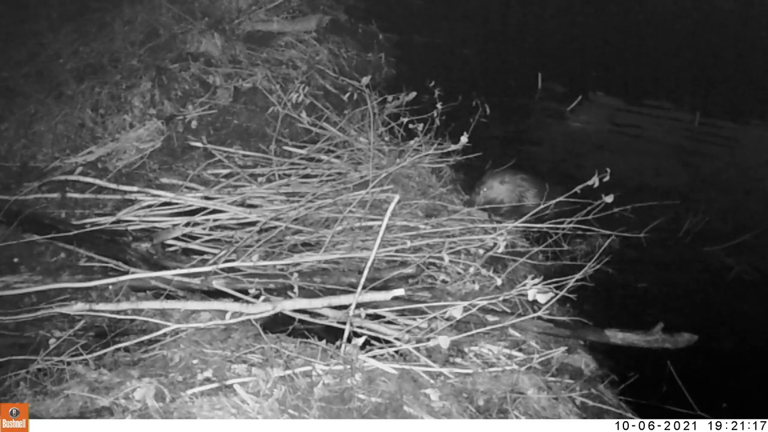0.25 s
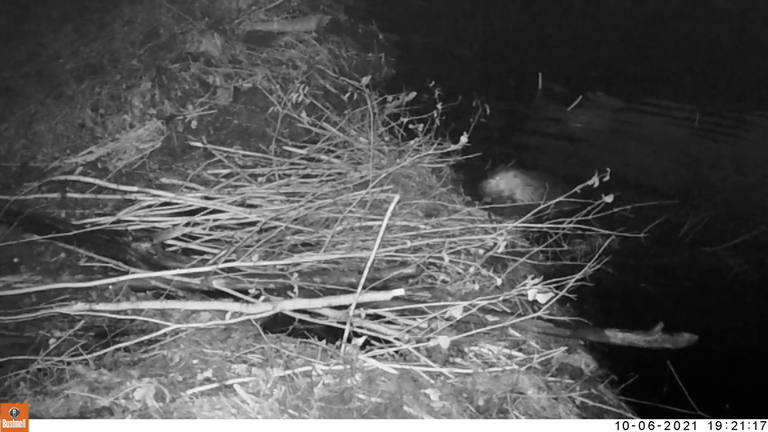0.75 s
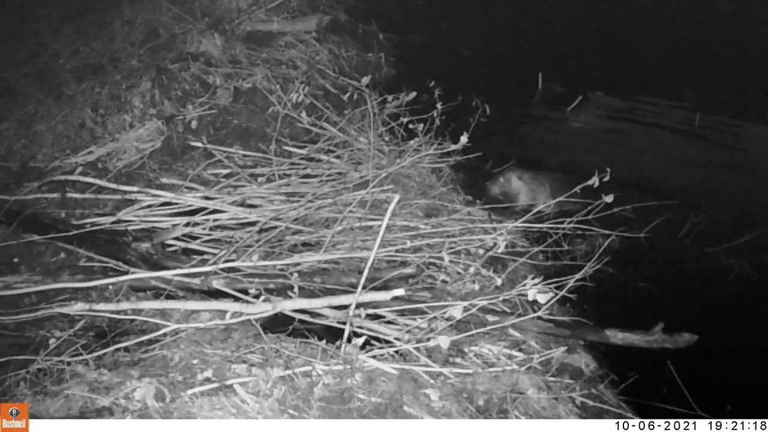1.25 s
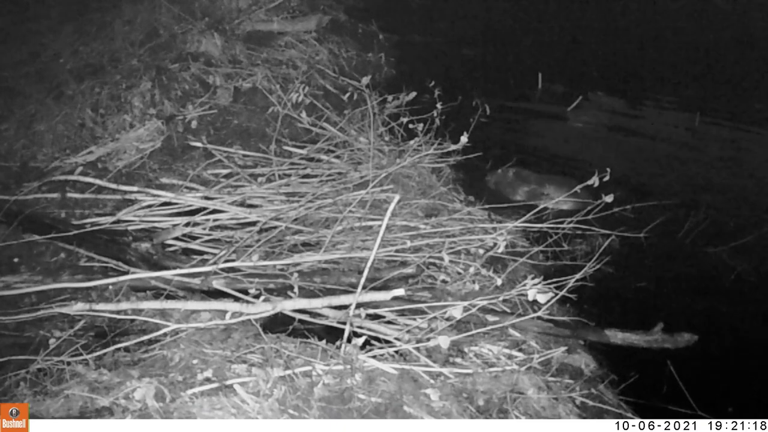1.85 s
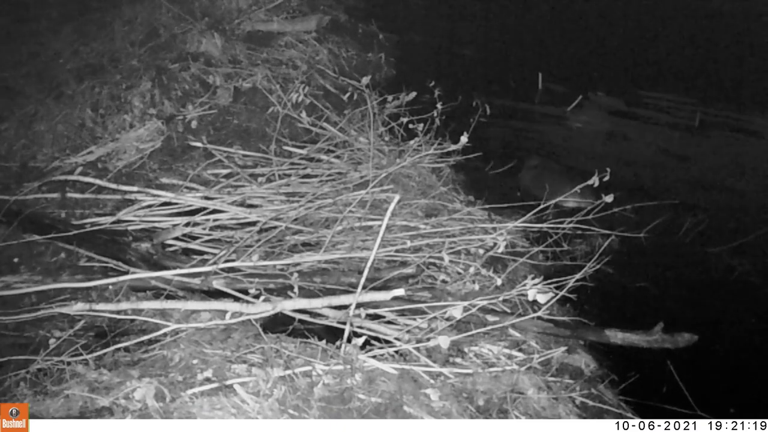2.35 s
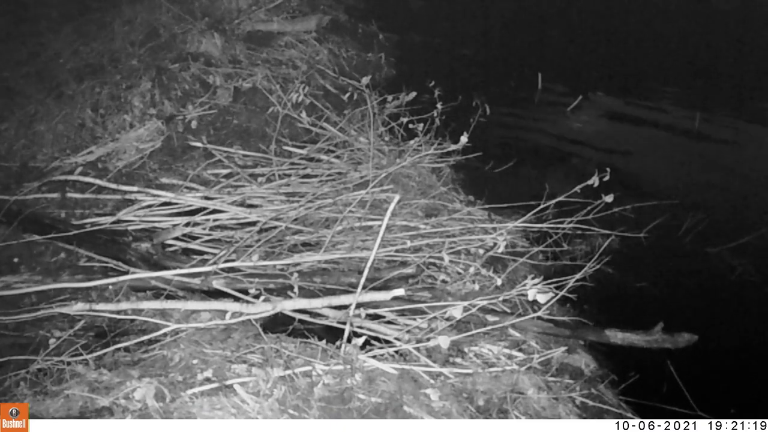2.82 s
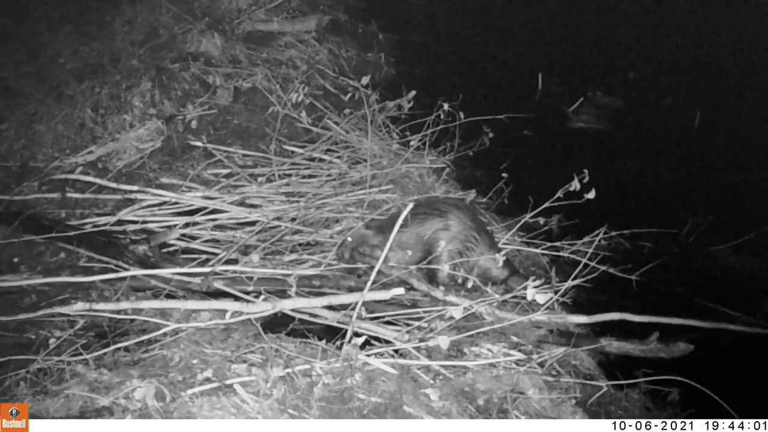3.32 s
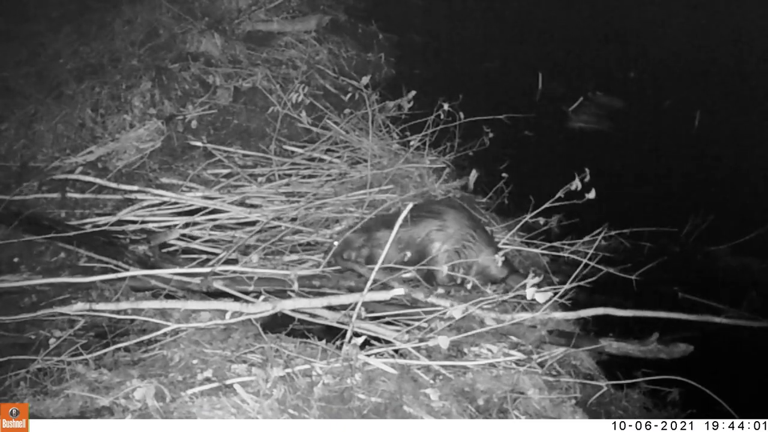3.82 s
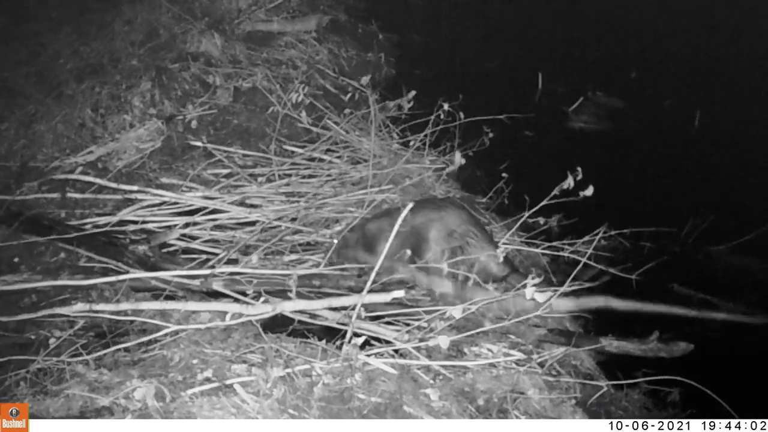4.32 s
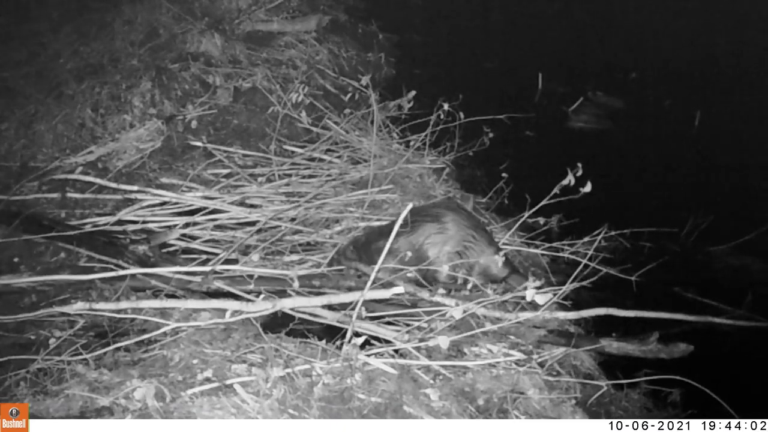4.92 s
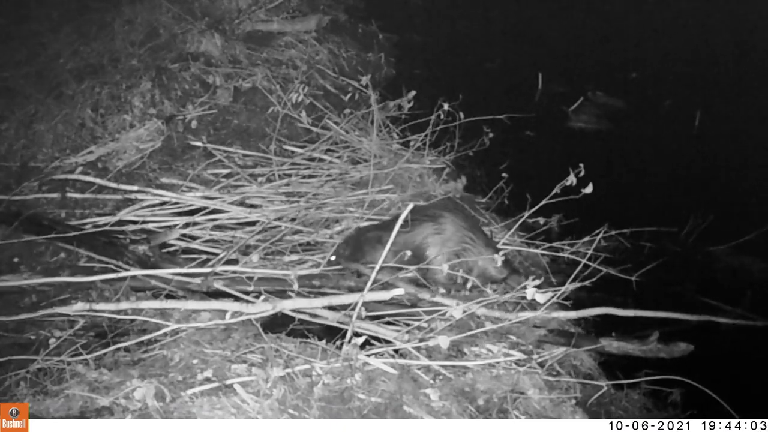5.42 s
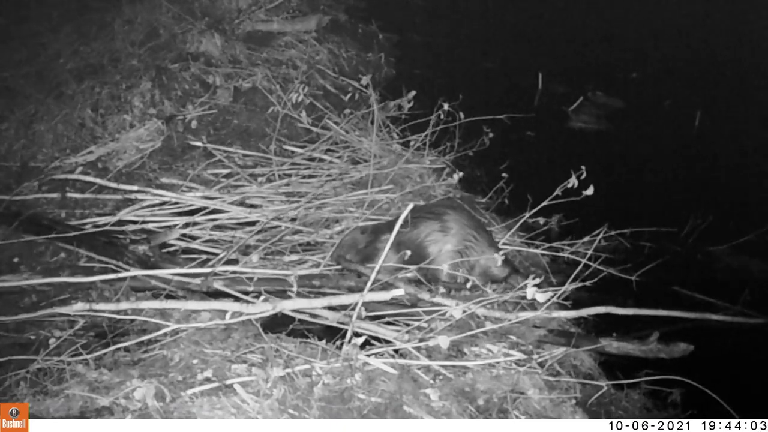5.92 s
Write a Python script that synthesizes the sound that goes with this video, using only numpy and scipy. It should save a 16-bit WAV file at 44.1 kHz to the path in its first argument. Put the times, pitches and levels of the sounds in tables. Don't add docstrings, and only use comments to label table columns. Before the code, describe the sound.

Water rushes low and steady at a stick dam while crickets trill shrilly nearby and droplets tick; sound nearly vanishes briefly past halfway, then twigs snap.

```python
import sys
import numpy as np
from scipy import signal
from scipy.fft import rfft, irfft
from scipy.io import wavfile
from scipy.ndimage import uniform_filter1d

SR = 44100
rng = np.random.default_rng(int(sys.argv[2]) if len(sys.argv) > 2 else 0)


def gain_from_decibels(decibels):
    exponent = np.asarray(decibels, float) / 20
    return 10 ** exponent


def pcm_store(signal):
    levels = np.round(np.clip(np.atleast_2d(signal), -1, 1) * 32767)
    wavfile.write(sys.argv[1], SR, levels.astype(np.int16).T)


N = 272087


def add(out, at_s, sound):
    i = int(at_s * SR)
    out[i:i + len(sound)] += sound[:max(N - i, 0)]


def walk(rate_hz):
    hold = int(SR / rate_hz)
    steps = np.repeat(rng.standard_normal(N // hold + 1), hold)
    return 1.52 * uniform_filter1d(uniform_filter1d(steps, hold), hold)[:N]


def band(x, lo_hz, hi_hz):
    return signal.sosfilt(signal.butter(2, [lo_hz, min(hi_hz, .45 * SR)], "band", fs=SR, output="sos"), x)


# pitch in Hz, level of the noise there in dB per Hz.
RUSH_COLOUR = [(8, 3), (30, 1), (70, -3.5), (160, -12), (440, -22.5), (1300, -34), (3200, -39.5),
               (5000, -41), (6300, -44.5), (7500, -44.5), (9500, -45.5), (14000, -47)]
# time in seconds, flow in dB.
RUSH_FLOW = [
    (0, 0.5),
    (1.6, 0.03),
    (3.3, -0.3),
    (3.9, 0.44),
    (4.9, 0.1),
    (6.17, 0.4),
]


def rush():
    hz = np.fft.rfftfreq(N, 1 / SR) + 1
    points, dbs = np.transpose(RUSH_COLOUR)
    colour = rfft(rng.standard_normal(N)) * gain_from_decibels(np.interp(np.log(hz), np.log(points), dbs))
    out, swell = 0, walk(2.966)
    for centre in np.arange(2, 15, .5):
        share = np.clip(1 - 2 * abs(np.log2(hz) - centre), 0, 1)
        flicker = walk(9.0)
        out = out + irfft(colour * share, N) * gain_from_decibels(.4 * swell + .5 * flicker)
    s, flow_db = np.transpose(RUSH_FLOW)
    return out / np.std(out) * gain_from_decibels(-34.0 + np.interp(np.arange(N) / SR, s, flow_db))


def cricket(strokes, wing, pace, top_hz, peak_db, scatter_db, wobble):
    ms = np.arange(int(.015 * SR)) * 1000 * pace / SR
    glide = 1 - wing["sag"] * np.clip((ms - wing["catch_ms"]) / wing["sag_ms"], 0, 1) ** wing["bend"]

    def swell(hold_db, peak_ms):
        moments_ms = [.3, wing["catch_ms"], wing["hold_ms"], peak_ms, wing["end_ms"]]
        return np.interp(ms, moments_ms, [0, gain_from_decibels(hold_db), gain_from_decibels(hold_db), 1, 0])

    shape = swell(wing["hold_db"], wing["peak_ms"])
    bright = gain_from_decibels(wing["octave_db"]) * swell(wing["octave_hold_db"], wing["octave_peak_ms"])
    tone, octave = np.zeros(N), np.zeros(N)
    for s, db, late_ms in strokes:
        size, tune, turn, shift = rng.standard_normal(4)
        teeth = uniform_filter1d(rng.standard_normal(len(ms)), size=40) * wobble
        pitch_hz = top_hz * glide * (1 + 0.004 * tune + teeth)
        phase = 2 * np.pi * (np.cumsum(pitch_hz) / SR + turn)
        catch = np.clip((ms - late_ms - .3) / 3.2, 0, 1) if late_ms else 1
        gain = gain_from_decibels(peak_db + db + scatter_db * size) * catch
        at_s = max(s + .00015 * shift, 0)
        add(tone, at_s, gain * shape * np.sin(phase))
        add(octave, at_s, gain * bright * np.sin(2 * phase))
    return tone, octave


def phrases(rows, period_s):
    break_s, recover_s = .0409, .0229
    out = []
    for (first, _), (following, db) in zip(rows, rows[1:]):
        last = following - break_s
        count = round((last - first) / period_s) + 1
        out += [(s, 0, 0) for s in np.linspace(first, last, count)]
        out.append((following - recover_s, db, 2.5 - .5 * db))
    return out


def tiring(first_s, strokes, period_ms, drag_ms, late_ms):
    return [(first_s + (k * period_ms + drag_ms * k ** 3) / 1000, 0, late_ms) for k in range(strokes)]


STROKE = dict(catch_ms=1.8, hold_ms=4.6, peak_ms=9.1, end_ms=12.0, hold_db=-5, sag=.142, sag_ms=10.3, bend=2.1, octave_db=-32, octave_hold_db=-3, octave_peak_ms=9.2)
# first stroke in seconds, level in dB of the stumble leading in.
NEAR_PHRASES = [(.0016, 0), (.1795, -1), (.3957, -3), (.9273, -3), (1.1646, -4), (1.363, -3), (1.6022, -3),
                (1.84, -3), (2.076, -3), (2.3325, -2), (2.5695, -3), (2.8093, -3), (3.1066, -4),
                (3.3647, -30)]


def near_cricket():
    strokes = phrases(NEAR_PHRASES, .01965)
    return sum(cricket(strokes, STROKE, pace=1.03, top_hz=4490, peak_db=-39.5, scatter_db=1.1, wobble=.025))


def tick(ring_hz, treble_db, body_db, spread):
    t = np.arange(int(.012 * SR)) / SR
    burst = rng.standard_normal(len(t)) * t / .0007 * np.exp(1 - t / .0007)
    ring = band(burst, ring_hz / spread, ring_hz * spread)
    ring = ring / abs(ring).max()
    crack = 0.51 * gain_from_decibels(treble_db) * band(burst, 7300.0, 10000.0)
    knock = 1.6 * gain_from_decibels(body_db) * band(burst, 1600.0, 2900.0)
    return ring + crack + knock


# time in seconds, peak level in dB, pitch of the ring in Hz.
TICKS = [(.0536, -45, 6160), (.1286, -46, 7000), (.7058, -46, 6060), (1.0176, -45, 6220),
         (1.292, -42, 6040), (1.3433, -46, 5910), (1.4112, -46, 6100), (1.536, -43, 6180),
         (1.7594, -39, 5740), (1.8173, -43, 5620), (1.881, -44, 5400), (2.388, -43, 5670),
         (2.5475, -43, 6000), (3.488, -43, 5700), (3.645, -41, 6900), (3.7494, -37, 6030),
         (3.9217, -45, 6560), (4.0319, -45, 5590), (4.2673, -37, 5760), (4.398, -39, 6030),
         (4.471, -41, 5980), (4.4889, -45, 6200), (4.5073, -42, 6800), (5.3559, -45, 5700),
         (4.9803, -45, 5500), (5.0027, -45, 5720), (5.2008, -43, 5830), (5.3015, -45, 6300),
         (5.5864, -46, 6330), (5.9146, -47, 6760)]


def droplets():
    out = np.zeros(N)
    when = rng.random(50)
    size, tune = rng.standard_normal((50, 2)).T
    strays = zip(when * N / SR, -51 + 2.5 * size, 6000 * (1 + .06 * tune))
    for s, db, hz in TICKS + list(strays):
        add(out, s + .0004, gain_from_decibels(db) * tick(hz, treble_db=-27, body_db=-7, spread=1.08))
    when, size = rng.random((1500, 2)).T
    taps = np.zeros(N)
    taps[(when * N).astype(int)] = gain_from_decibels(-57 + 11.5 * size ** 3) * np.sign(rng.standard_normal(len(when)))
    clumps = gain_from_decibels(1.5 * walk(4) + 3 * walk(25) - 1.5)
    return out + 10.0 * band(band(taps * clumps, 5700.0, 6930.0), 4900.0, 6700.0)


def bubble(hz, cycles, rise):
    t = np.arange(int(4 * cycles / hz * SR)) / SR
    ring = np.sin(2 * np.pi * hz * t * (1 + rise * t * hz / cycles))
    return ring * np.exp(-t * hz / cycles) * np.minimum(t / 0.0009, 1)


# time in seconds, peak level in dB, starting pitch in Hz.
DRIPS = [(0.1181, -44, 1640), (0.1994, -46, 1560), (0.4309, -42, 1840), (0.8649, -43, 2360),
         (1.0246, -46, 1780), (1.1094, -48, 1790), (1.917, -44, 1880), (2.7994, -43, 1330),
         (4.4844, -49, 2930), (4.5446, -42, 2960), (5.9294, -48, 1470)]


def trickle():
    out = np.zeros(N)
    for s, db, hz in DRIPS:
        add(out, s, gain_from_decibels(db - 2.5) * bubble(hz, cycles=11.0, rise=.025))
    for when, tune, size in rng.random((400, 3)):
        gurgle = bubble(700 * 4.5 ** tune, cycles=9.2, rise=0.062)
        add(out, when * N / SR, gain_from_decibels(-63.0 + 13.0 * size ** 2) * gurgle)
    return out


RIVAL_STROKE = dict(catch_ms=2.0, hold_ms=3.8, peak_ms=7.0, end_ms=13.2, hold_db=-3, sag=.12, sag_ms=8.5, bend=1.3, octave_db=-15, octave_hold_db=-9, octave_peak_ms=11.0)
# time in seconds, level in dB.
RIVAL_EFFORT = [
    (.4, -24),
    (.7, -13),
    (1.1, -8),
    (1.55, 0),
]


def rival_cricket():
    strokes = tiring(first_s=.3929, strokes=143, period_ms=20.375, drag_ms=1.29e-5, late_ms=0)
    tone, octave = cricket(strokes, RIVAL_STROKE, pace=1, top_hz=4520, peak_db=-41.5, scatter_db=.9, wobble=.015)
    s, effort_db = np.transpose(RIVAL_EFFORT)
    effort_db = np.interp(np.arange(N) / SR, s, effort_db)
    return tone * gain_from_decibels(effort_db) + octave * gain_from_decibels(.35 * effort_db)


# first stroke in seconds, level in dB of the stumble leading in.
LATE_PHRASES = [
    (3.341, 0),
    (3.402, -5),
    (3.9406, -1),
    (4.3013, -6),
    (4.7808, 0),
    (5.1438, -3),
    (5.351, -1),
]


def late_cricket():
    wind_down = tiring(first_s=5.3778, strokes=17, period_ms=22.5, drag_ms=.009, late_ms=2.2)
    restart = [(6.114 + k * .026, -10 / 2 ** k, 3 - k) for k in range(3)]
    strokes = phrases(LATE_PHRASES, .02) + wind_down + restart
    return sum(cricket(strokes, STROKE, pace=1, top_hz=4410, peak_db=-38.6, scatter_db=.5, wobble=.025))


# start in seconds, length in seconds, level in dB, lowest pitch in Hz, highest pitch in Hz.
CRACKLE = [(4.266, 0.0049, -38, 4500, 10500), (4.267, 0.0052, -36, 1200, 3500),
           (4.483, 0.0092, -46, 1400, 9000), (4.51, .010, -57, 4800, 9500), (4.535, 0.021, -45, 2500, 9000),
           (4.555, 0.014, -38, 2200, 9600), (4.488, 0.065, -55, 2500, 12000),
           (4.567, 0.0092, -39, 5500, 9800), (4.584, 0.14, -55, 5000, 10000),
           (5.884, 0.0018, -39, 7500, 13000)]


def twigs():
    out = np.zeros(N)
    for s, length_s, db, lo_hz, hi_hz in CRACKLE:
        n = int(length_s * SR)
        clicks = rng.standard_normal(n) * rng.standard_normal(n) * np.hanning(n) ** .5
        add(out, s, gain_from_decibels(db) * band(np.pad(clicks, (0, 200)), lo_hz, hi_hz))
    return out


# time in seconds, peak level in dB, pitch of the
# ring in Hz.
SNAPS = [
    (4.5327, -37, 7400),
    (4.5607, -22.5, 7200),
    (4.5622, -35, 3300),
    (4.5722, -33, 9000),
    (5.8845, -38, 11500),
]


def snaps():
    out, t = np.zeros(N), np.arange(int(.008 * SR)) / SR
    crack = 1.5
    for s, db, hz in SNAPS:
        fade = (np.exp(-t / .0011) + crack * np.exp(-t * hz / 2.5)) / (1 + crack)
        add(out, s, gain_from_decibels(db) * fade * np.sin(2 * np.pi * hz * t))
    return out


def bank_echo(close):
    t = np.arange(int(.06 * SR)) / SR
    bank = rng.standard_normal(len(t)) * np.exp(-t / 0.019) * (t > .002)
    return gain_from_decibels(-41.0) * signal.fftconvolve(close, bank)[:N]


def scene():
    water = rush()
    crickets = near_cricket() + rival_cricket() + late_cricket()
    close = crickets + droplets() + trickle() + twigs() + snaps()
    return (close + bank_echo(close) + water)[None]


def lose_faint_treble(sound, hush_s):
    hz, s, frames = signal.stft(sound, SR, "hann", 2048, 1536)
    power = uniform_filter1d(uniform_filter1d(abs(frames) ** 2, size=5, axis=1), size=3, axis=2)
    typical = uniform_filter1d(power, size=60, axis=1)
    limit = np.interp(hz, [8600, 9600, 11000, 14000], [0, .45, .72, .78])[:, None]
    top_hz = np.where((s > hush_s[0]) & (s < hush_s[1]), 12800, 13900)
    kept = (power > limit * typical) * (hz[:, None] < top_hz)
    return signal.istft(frames * kept, SR, "hann", 2048, 1536)[1][:, :N]


def roll_off(x):
    return signal.sosfilt(signal.butter(12, 14920, fs=SR, output="sos"), x)


def record(dry):
    hush_s, hush_gain = (3.3452, 3.8276), gain_from_decibels(-24.6)
    thinned = lose_faint_treble(dry, hush_s)
    turns_s = [hush_s[0] - .002, hush_s[0], hush_s[1], hush_s[1] + .0001]
    gain = np.interp(np.arange(N) / SR, turns_s, [1, hush_gain, hush_gain, 1])
    hiss = gain_from_decibels(-81.0) * band(rng.standard_normal(N), 3500., 10500.)
    return roll_off(thinned * gain + hiss)


dry = scene()
out = record(dry)
pcm_store(out)
```